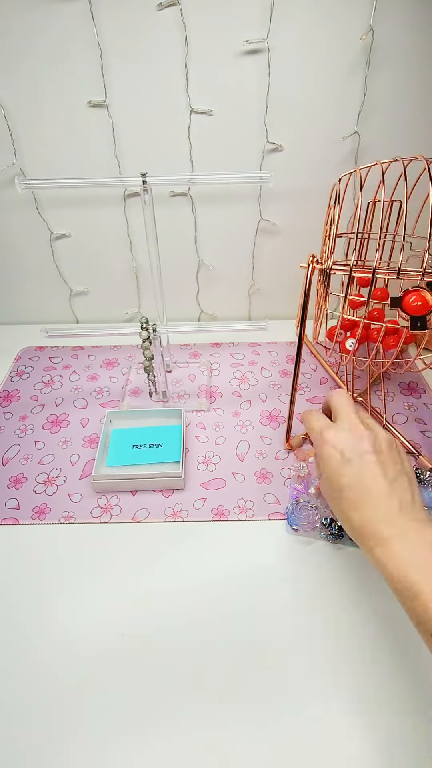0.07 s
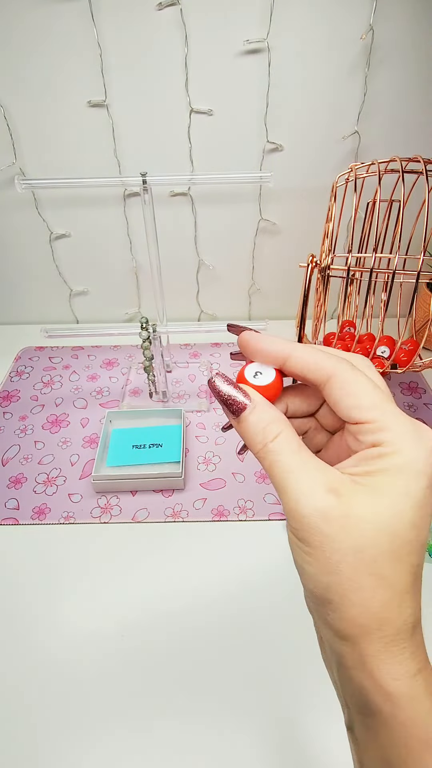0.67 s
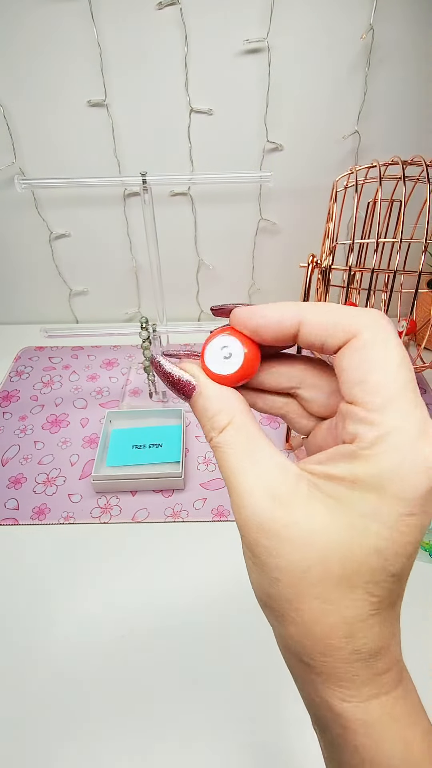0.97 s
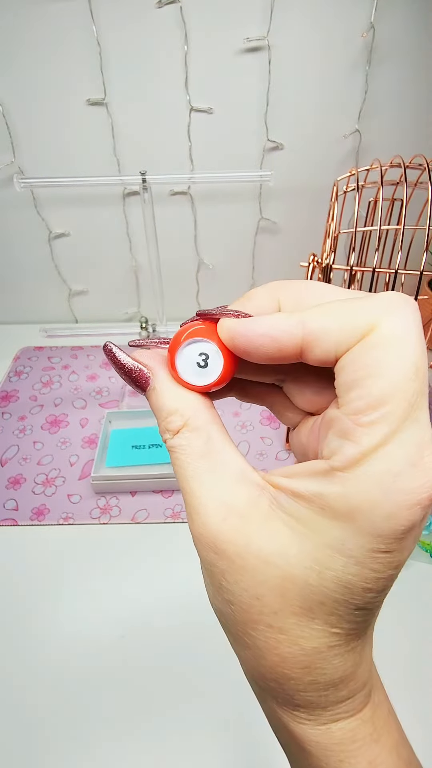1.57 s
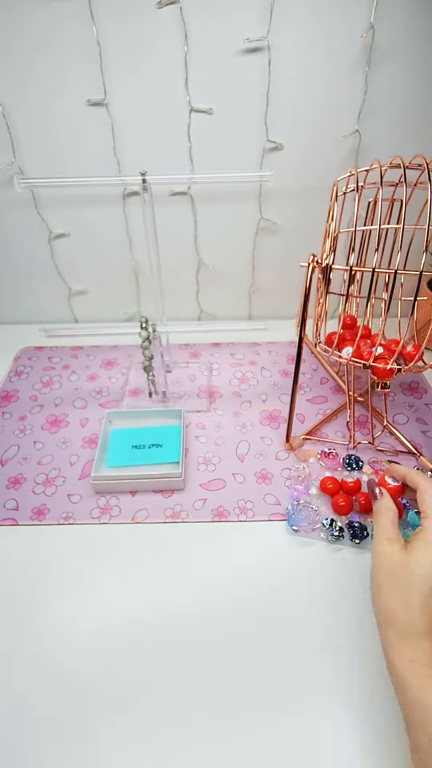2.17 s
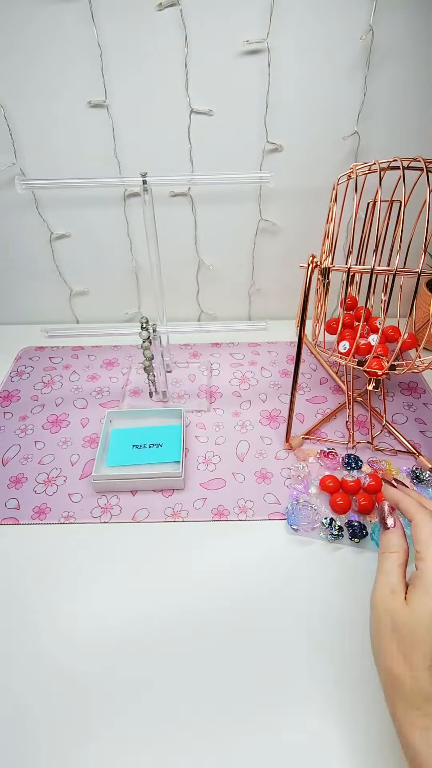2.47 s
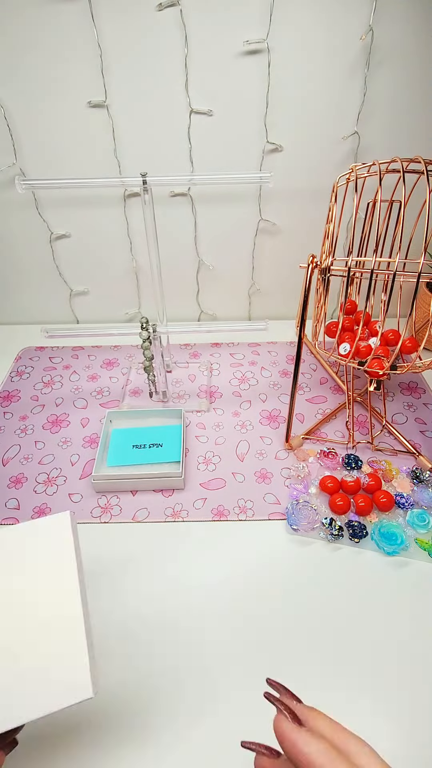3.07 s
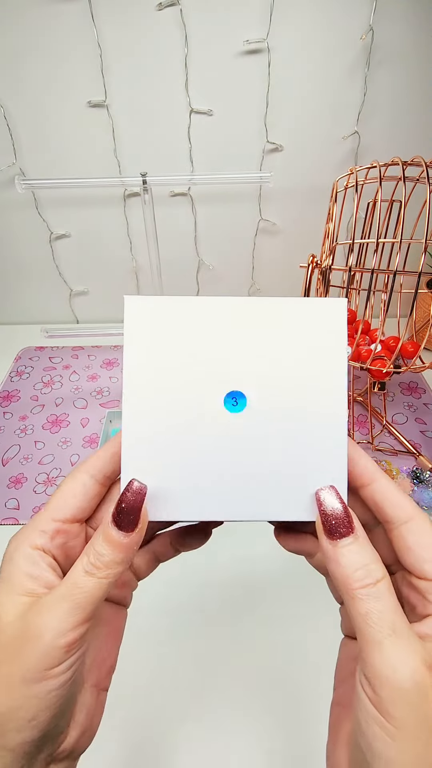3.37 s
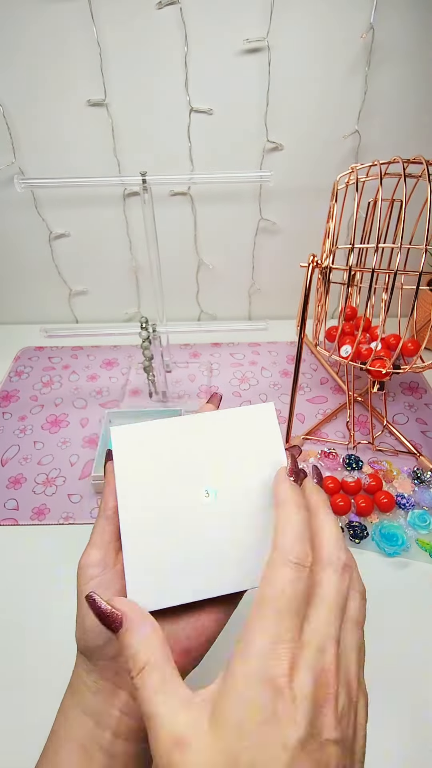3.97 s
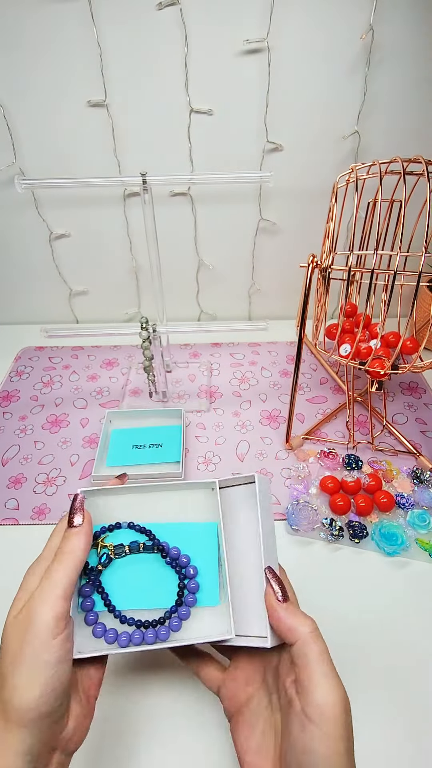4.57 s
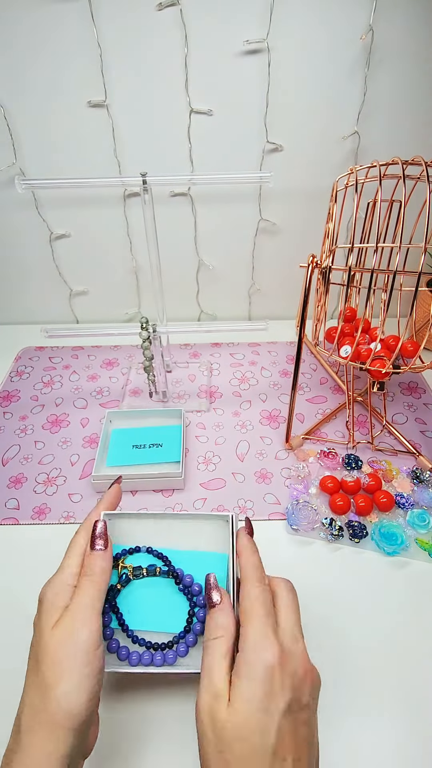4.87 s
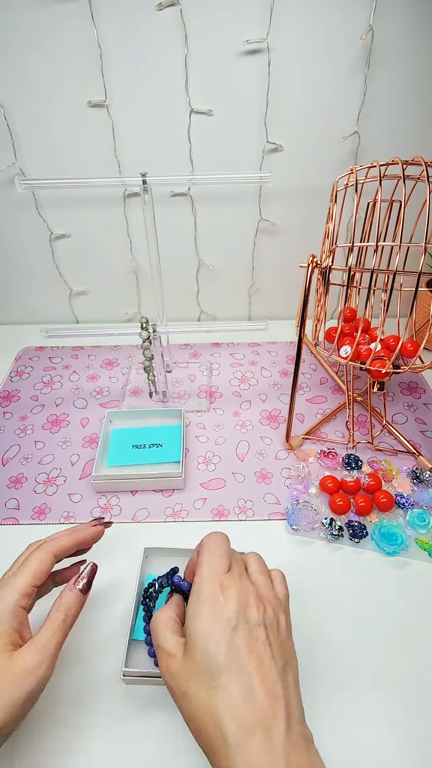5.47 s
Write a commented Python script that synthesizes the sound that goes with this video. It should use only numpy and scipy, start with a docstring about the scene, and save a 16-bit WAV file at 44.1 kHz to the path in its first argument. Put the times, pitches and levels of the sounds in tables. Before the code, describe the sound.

Plastic balls rattle in a ringing wire cage, then a cardboard box is slid open and set down with beads clicking.

```python
"""Plastic balls tumble in a wire lottery cage on a desk, making its wires and stand ring, then shift
in short spills as it rocks to rest. Next, one ball is set down among others with a brief clatter.
A small cardboard box is picked up; its lid rubs and squeaks as it slides off, and the box is put down.
Last, fingernails reach for the bead bracelets inside, which click and rustle.
All of it is heard in a small quiet room, through a close stereo microphone."""
import sys
import numpy as np
from scipy import signal
from scipy.fft import rfft, irfft
from scipy.io import wavfile

SR = 44100
rng = np.random.default_rng(int(sys.argv[2]) if len(sys.argv) > 2 else 0)


def store_wav(level_fs):
    """Save 16-bit WAV to argv[1]."""
    pcm = np.round(np.clip(np.atleast_2d(level_fs), -1, 1) * 32767)
    wavfile.write(sys.argv[1], SR, pcm.T.astype(np.int16))


N = 242991
TIME = np.arange(N) / SR


def from_db(db):
    """Turn decibels into a gain to multiply by."""
    return 10 ** (np.asarray(db) / 20)


def rms_one(x):
    """Scale a sound to an average power of one."""
    return x / np.sqrt(np.mean(x ** 2) + 1e-20)


def add(out, s, sound):
    """Mix a sound in, starting at s seconds."""
    start = int(np.clip(round(s * SR), 0, N))
    out[:, start:start + sound.shape[1]] += sound[:, :N - start]


def pan(x, left_db):
    """Make the left side louder than the right by left_db."""
    return x * from_db([[left_db / 2], [-left_db / 2]])


def noise(size, alike=0):
    """White noise at two microphones that share a part of it."""
    white = rng.standard_normal((3, size))
    return np.sqrt(alike) * white[0] + np.sqrt(1 - alike) * white[1:]


def spaced_noise(size, shared_below_hz=390):
    """Stereo noise: long waves reach both microphones alike, short ones differ."""
    hz = np.arange(size // 2 + 1) * SR / size
    alike = 1 / (1 + (hz / shared_below_hz) ** 4)
    white = rfft(rng.standard_normal((3, size)))
    return irfft(np.sqrt(alike) * white[0] + np.sqrt(1 - alike) * white[1:], size)


def band(x, low_hz, high_hz, order=2):
    """Keep what lies between two frequencies."""
    return signal.sosfilt(signal.butter(order, [low_hz, high_hz], "band", fs=SR, output="sos"), x)


def brighten(x, treble_db, corner_hz=7000):
    """Turn the treble above the corner up or down."""
    treble = signal.sosfiltfilt(signal.butter(2, corner_hz, "high", fs=SR, output="sos"), x)
    return x + (from_db(treble_db) - 1) * treble


def resonate(x, hz, width_hz):
    """Ring at one note; the narrower the width, the longer it rings."""
    r = np.exp(-np.pi * width_hz / SR)
    feedback = [1, -2 * r * np.cos(2 * np.pi * hz / SR), r * r]
    return signal.lfilter(np.array([1, 0, -1]) * (1 - r * r) / 2, feedback, x)


def body(x, spectrum, notes=(), size=8192):
    """Pass a sound through an object, which gives it a tone colour and ringing notes."""
    hz, db = np.transpose(spectrum)
    bins_hz = np.maximum(np.arange(size // 2 + 1) * SR / size, 1)
    gains = from_db(np.interp(np.log(bins_hz), np.log(hz), db))
    cepstrum = irfft(np.log(gains))
    colour = irfft(np.exp(rfft(2 * cepstrum[:size // 2], size)))   # nothing sounds before the hit
    response = colour + sum(from_db(level) * resonate(colour, f, width) for f, width, level in notes)
    return signal.fftconvolve(x, response[None] / np.linalg.norm(response))[:, :x.shape[1]]


def grains(size, per_s, spread_db, fall_s):
    """The flickering loudness of many tiny contacts."""
    hits = rng.random(size) < per_s / SR
    strength = from_db(spread_db * np.minimum(rng.exponential(1, size), 3))
    power = signal.lfilter([1], [1, -np.exp(-2 / (fall_s * SR))], (hits * strength) ** 2 + 1e-12)
    return rms_one(np.sqrt(power))


def swell(fall_s, rise_share=0.92, rounding=0.37, cut_at=3.4):
    """A loudness curve with a round peak and steep ends, and the seconds it takes to peak."""
    rise_s = rise_share * fall_s
    t = np.arange(-7 * rise_s, 7 * fall_s, 1 / SR)
    distance = np.where(t < 0, t / rise_s, t / fall_s)
    fade = np.hypot(distance, rounding) - rounding
    return np.exp(-fade - (fade / cut_at) ** 4), 7 * rise_s


def shaped(x, envelope):
    """Give a noise this loudness curve and the energy that goes with it."""
    return rms_one(x * envelope) * np.sqrt(np.mean(envelope ** 2))


def hiss(size, treble_db):
    """The noise of surfaces touching: a bright band with a treble band above it."""
    bright = rms_one(band(noise(size), 2350, 5600))
    return bright + from_db(treble_db) * rms_one(band(noise(size), 6000, 12500))


# The steady air of the room. Each row: frequency in Hz, relative level in dB.
AIR_COLOUR = [(8, -12), (20, -1.5), (70, -4), (130, -10.5), (250, -19), (500, -20.5), (900, -20.5),
              (1300, -25), (2500, -34.5), (4000, -42), (7000, -46), (10000, -56), (16000, -56.5)]
# A low rumble. Each row: time in seconds, relative level in dB.
RUMBLE_LEVELS = [(0, -74.5), (1.5, -72), (1.7, -60.5), (2.1, -60.5), (2.4, -66.5), (2.85, -62.5),
                 (3.1, -81), (5.5, -78)]

def background(air_db=-65, rumble_trim_db=-1):
    """Steady room air and a low rumble that comes and goes."""
    air = body(spaced_noise(N, shared_below_hz=670) + 0.16 * noise(N), AIR_COLOUR)
    rumble = rms_one(band(noise(N, alike=0.65), 100, 160, order=3))
    rumble_db = np.interp(TIME, *np.transpose(RUMBLE_LEVELS)) + rumble_trim_db
    return from_db(air_db) * air + from_db(rumble_db) * rumble


def room_echo(x, echo_db=-13, die_away_s=0.18, first_echo_s=0.0018, treble_hz=7000, treble_lasts=0.82):
    """A blur of echoes from desk and walls; the treble dies sooner."""
    t = TIME[:SR // 2]
    scatter = spaced_noise(len(t)) * (t > first_echo_s)
    dull = signal.sosfiltfilt(signal.butter(1, treble_hz, fs=SR, output="sos"), scatter)
    fade_db = -60 * t / die_away_s
    tail = dull * from_db(fade_db) + (scatter - dull) * from_db(fade_db / treble_lasts)
    return from_db(echo_db) * signal.fftconvolve(x, tail / np.linalg.norm(tail[0]), axes=1)[:, :N]


# The bracelets slip in the box. Each row: peak time and fade time in seconds, level in dB, treble in dB.
BRACELET_SLIPS = [(4.842, 0.019, -50.5, -14), (5.074, 0.011, -50, -24), (5.151, .024, -46, -12),
                  (5.323, .012, -50, -8), (5.368, .011, -46.5, -13), (5.474, 0.016, -59.5, 6.5)]

def bead_slips():
    """Beads slide over card and each other in a rustle of tiny ticks."""
    out = np.zeros((2, N))
    for s, fall_s, db, treble_db in BRACELET_SLIPS:
        shape, lead_s = swell(fall_s)
        ticks = grains(len(shape), per_s=990, spread_db=0, fall_s=0.0014) * hiss(len(shape), treble_db)
        add(out, s - lead_s, from_db(db) * shaped(ticks, shape))
    return out


# Nails, balls and beads touch. Each row: start in seconds, level in dB, treble boost in dB.
SMALL_CLICKS = [(2.096, -51, -9), (2.512, -49.5, 0), (2.79, -53.5, -16), (2.837, -57, 21),
                (3.198, -45.5, 6), (3.234, -39, -14), (4.687, -38.5, -10), (4.829, -41, -26),
                (4.907, -41, 4), (5.073, -39.5, -27), (5.082, -42, -20), (5.105, -22.5, -5),
                (5.2996, -31.5, -36), (5.309, -40, -22), (5.454, -42.5, 14), (5.507, -51, 9)]
# The notes of a bead. Each row: pitch in Hz, width in Hz, boost in dB.
BEAD_NOTES = [(4700, 380, 6.5), (6460, 200, -20), (8000, 500, -0.5)]

def clicks(fall_s=0.0028):
    """Small hard things touch with a very short, bright snap."""
    force, t = np.zeros((2, N)), TIME[:SR // 25]
    for s, db, treble_db in SMALL_CLICKS:
        snap = rms_one(brighten(noise(len(t)), treble_db))
        add(force, s, from_db(db) * np.exp(-t / fall_s) * snap)
    colour = [(300, -8.5), (1400, 4), (3000, -4), (8000, -3.5), (16000, -0.5)]   # Hz, dB
    return pan(body(force, colour, BEAD_NOTES), left_db=-1.5)


def box_wall(x, hz, relative_width=0.23):
    """A cardboard wall rings briefly at a main note and two weaker ones, above and below it."""
    ring = resonate(x, hz, relative_width * hz)
    for ratio in 1.58, 0.66:
        ring -= from_db(-7) * resonate(x, ratio * hz, relative_width * hz)
    return rms_one(band(ring, 540, 3100))


def blow(fall_s, wall_hz, wall_db, crack_db, treble_db, thump_db, desk_hz=150, desk_fall_s=0.0091):
    """A blow on cardboard: the walls' short rattle, a crack and a low thump."""
    t = TIME[:SR // 8]
    shape = (1 - np.exp(-t / 0.0005)) * np.exp(-t / fall_s)   # cardboard yields before it pushes back
    wall = shaped(box_wall(noise(len(t), alike=0.6), wall_hz, relative_width=0.34), shape)
    crack = shape * hiss(len(t), treble_db)
    thump = np.sin(2 * np.pi * desk_hz * t) * np.exp(-t / desk_fall_s)
    return from_db(wall_db) * wall + from_db(crack_db) * crack + from_db(thump_db) * thump


# The notes of the open box. Each row: pitch in Hz, relative level in dB, seconds to fade by 60 dB.
OPEN_BOX_NOTES = [(572, 0, 0.069), (904, -14.5, 0.074), (1206, -18, .05), (1690, -15, 0.048)]
# The box lands on one edge, then flat. Each row: start in seconds, levels of wall, ring and crack
# in dB, treble compared with the crack in dB.
BOX_LANDINGS = [(5.1089, -25, -33.5, -32.5, -3), (5.1519, -32, -27, -28, -21)]

def box_landings(fall_s=0.0058, wall_hz=1050, thump_db=-44):
    """The open box hits the desk, where it is free to ring."""
    out, t = np.zeros((2, N)), TIME[:SR // 8]
    ring = np.sqrt(2) * sum(from_db(db - 60 * t / ring_s) * np.sin(2 * np.pi * hz * t)
                            for hz, db, ring_s in OPEN_BOX_NOTES)
    for s, wall_db, ring_db, crack_db, treble_db in BOX_LANDINGS:
        hit = blow(fall_s, wall_hz, wall_db, crack_db, treble_db, thump_db)
        add(out, s, pan(from_db(ring_db) * ring, left_db=2.5) + hit)
    return pan(out, left_db=2)


# The hollow note of the box. Each row: time in seconds, pitch in Hz.
HOLLOW_PITCHES = [(3, 635), (3.3, 470), (3.85, 558), (4.1, 364), (4.5, 346), (4.6, 530), (4.9, 442),
                  (5.15, 557)]

def hollow_note(s):
    """Pitch of the air in the box at this moment, lower while the hand clasps it."""
    return np.interp(s, *np.transpose(HOLLOW_PITCHES))


# Knocks on the held box. Each row: start in seconds, level in dB, wall pitch in Hz,
# hollow note compared with the wall in dB, thump level in dB.
BOX_KNOCKS = [(3.234, -28, 1370, -8.5, -56), (3.288, -45.5, 1480, -9, -66), (3.773, -43.5, 1420, -7.5, -60),
              (3.921, -36.5, 1530, -23, -75), (3.996, -47.5, 830, -1, -62), (4.23, -39, 1230, 1.5, -48),
              (4.264, -29.5, 894, -1, -48), (4.675, -33, 1410, -17, -73), (4.688, -25.5, 1460, -15, -70),
              (4.827, -31, 1200, -23, -54), (4.907, -28.5, 1090, -8.5, -51),
              (4.958, -30.5, 1280, -17.5, -45.5), (5.277, -35, 1740, -29, -59)]

def box_knocks(fall_s=0.0045, hollow_fall_s=0.0043):
    """Each knock is a blow plus the hollow note of the box, cut short by the hand."""
    out, t = np.zeros((2, N)), TIME[:SR // 8]
    for s, db, wall_hz, hollow_db, thump_db in BOX_KNOCKS:
        hollow = np.sqrt(2) * np.sin(2 * np.pi * hollow_note(s) * t) * np.exp(-t / hollow_fall_s)
        hit = blow(fall_s, wall_hz, db, crack_db=db - 11.5, treble_db=-19, thump_db=thump_db)
        add(out, s, from_db(db + hollow_db) * hollow + hit)
    return pan(out, left_db=3.5)


def card_hiss(size, db, middling_db=-52, duller_per_db=0.16):
    """Hiss of sliding card: the harder the stroke, the duller."""
    return from_db(db) * hiss(size, treble_db=-10.5 - duller_per_db * (db - middling_db))


# The tight lid squeaks. Each row: peak time and fade time in seconds, level in dB, pitch in Hz.
LID_SQUEAKS = [(4.387, .011, -54.5, 1155), (4.737, 0.016, -46, 1050), (4.807, 0.0082, -43, 1036),
               (4.833, 0.0058, -37.5, 1200), (4.908, .005, -32.5, 1126), (4.959, .008, -38, 1324),
               (4.99, 0.02, -46.5, 1160)]

def lid_squeaks(width_hz=160, wall_db=-5, hiss_db=-8):
    """The lid sticks and slips fast enough to sing one narrow, rough note."""
    out = np.zeros((2, N))
    for s, fall_s, db, hz in LID_SQUEAKS:
        shape, lead_s = swell(fall_s)
        n = len(shape)
        note = resonate(noise(n, alike=0.5), hz, width_hz)
        note = shaped(resonate(note, hz, width_hz), shape)
        wall = from_db(wall_db) * shaped(box_wall(noise(n), hz), shape)
        slips = grains(n, per_s=1200, spread_db=-2.5, fall_s=0.0025)
        contact = shape * slips * card_hiss(n, db + hiss_db)
        add(out, s - lead_s, from_db(db) * (note + wall) + contact)
    return pan(out, left_db=-0.2)


# Fingers and lid slide on the cardboard. Each row: peak time and fade time in seconds, level in dB,
# wall pitch in Hz, then hollow note and hiss, both compared with the wall in dB.
BOX_STROKES = [(3.026, .016, -62, 840, 4, -1), (3.109, 0.067, -75, 1360, -6, 0),
               (3.204, .013, -58, 1300, 1.5, -3), (3.229, 0.0062, -50.5, 1380, -5, -2),
               (3.49, 0.0095, -68, 1130, -4, -18), (3.728, 0.012, -71, 1400, -3, -5),
               (3.847, 0.031, -58.5, 1260, 1, -4.5), (3.932, .009, -33, 1490, -15, -14.5),
               (4.063, .018, -59, 1200, -1, -2.5), (4.107, .013, -42, 1480, -6, -10),
               (4.169, 0.023, -53.5, 1310, 2.5, -11.5), (4.24, .0095, -37, 1310, -2.5, -14.5),
               (4.275, .014, -37, 984, -14.5, -11), (4.442, .017, -44, 1280, -21, -3),
               (4.519, .018, -41.5, 1040, -3, -5.5), (4.585, 0.025, -36, 1490, -9, -6),
               (4.69, .012, -24.5, 1344, -8, -12.5), (5.129, 0.024, -46, 1140, -10, -1.5),
               (5.271, .007, -60, 1600, -8, -8), (5.367, .011, -48.5, 1440, -6, -8),
               (5.423, 0.021, -64, 1310, -1, 0.5)]

def box_rubs(hollow_width_hz=190, trim_db=-0.2):
    """Tiny sticks and slips stir the air in the box and its walls, and hiss where they touch."""
    out = np.zeros((2, N))
    for s, fall_s, db, wall_hz, hollow_db, hiss_db in BOX_STROKES:
        shape, lead_s = swell(fall_s)
        n = len(shape)
        slips = grains(n, per_s=2200, spread_db=1, fall_s=0.0023)
        air = resonate(slips * noise(n, alike=0.32), hollow_note(s), hollow_width_hz)
        hollow = from_db(hollow_db) * shaped(band(air, 150, 800), shape)
        wall = shaped(box_wall(slips * noise(n, alike=0.18), wall_hz), shape)
        contact = shape * slips * card_hiss(n, db + hiss_db)
        add(out, s - lead_s, from_db(db) * (hollow + wall) + contact)
    return pan(from_db(trim_db) * out, left_db=1)


def box_shudder(hz=215, width_hz=90, trim_db=-7.5):
    """The same strokes shake the whole box in the hand, more so when its hollow note is low."""
    out = np.zeros((2, N))
    for s, fall_s, db, _, hollow_db, _ in BOX_STROKES:
        shape, lead_s = swell(fall_s)
        gain = from_db(db + hollow_db + trim_db) * (350 / hollow_note(s)) ** 3
        shudder = resonate(noise(len(shape), alike=0.47), hz, width_hz)
        add(out, s - lead_s, gain * shaped(shudder, shape))
    return out


# The tone of balls bumping on the desk. Each row: frequency in Hz, relative level in dB.
HEAP_COLOUR = [(50, -22), (100, -13.5), (280, -6.5), (400, -9.5), (560, -5.5), (950, -1.5), (1400, -1.5),
               (2200, -3), (3000, -6), (4500, -5.5), (6200, -4), (7500, -10.5), (10000, -14),
               (16000, -21.5)]
# The notes of those balls and their tray. Each row: pitch in Hz, width in Hz, boost in dB.
HEAP_NOTES = [(555, 22, 2), (865, 71, 1.5), (1360, 56, 2), (2200, 65, -0.5), (2420, 45, -5.5),
              (3250, 77, -2), (4530, 56, -2.5), (5800, 75.3, -2), (6260, 280, 0.5)]
# The held ball nudges the heap. Each row: peak time and fade time in seconds, level in dB.
BALL_NUDGES = [(2.303, .011, -51.5), (2.374, 0.009, -24), (2.494, 0.0077, -46), (2.523, .009, -47),
               (2.832, .014, -56.5), (2.888, .01, -59.5)]

def ball_set_down(firm_db=-24, brighter_per_db=0.67):
    """The ball shoves its neighbours: brief clatters that swell and die, duller when gentle."""
    force = np.zeros((2, N))
    for s, fall_s, db in BALL_NUDGES:
        shape, lead_s = swell(fall_s)
        clatter = spaced_noise(len(shape)) * grains(len(shape), per_s=2400, spread_db=1, fall_s=0.0019)
        clatter = brighten(shaped(clatter, shape), brighter_per_db * (db - firm_db), corner_hz=1900)
        add(force, s - lead_s, from_db(db) * clatter)
    return pan(body(force, HEAP_COLOUR, HEAP_NOTES), left_db=1.5)


# Balls spill over each other in the cage. Each row: start in seconds, length in seconds, level in dB.
BALL_SPILLS = [(0, 0.13, -33.5), (0.094, .15, -27.5), (0.257, 0.079, -32.5), (0.327, 0.054, -30.5),
               (0.407, 0.0055, -34.5), (0.502, 0.028, -59), (0.73, 0.044, -39), (0.787, 0.028, -46.5),
               (0.835, 0.083, -38), (1.015, .005, -45.5), (1.114, 0.033, -41.5), (1.183, .034, -46),
               (1.385, 0.013, -55), (2.089, 0.032, -62.5), (2.785, 0.03, -60.5)]

def tumble_db(rise_db_per_s=1500, sag_db_per_s=41, fall_db_per_s=472):
    """How lively the balls are: each spill rises fast, sags while it lasts and dies away."""
    level_db = np.full(N, -140.0)
    for s, length_s, db in BALL_SPILLS:
        before = rise_db_per_s * np.maximum(s - TIME, 0)
        during = sag_db_per_s * np.clip(TIME - s, 0, length_s)
        after = fall_db_per_s * np.maximum(TIME - s - length_s, 0)
        level_db = np.maximum(level_db, db - before - during - after)
    return level_db


# The high notes of the cage wires. Each row: pitch in Hz, width in Hz, relative level in dB.
WIRE_NOTES = [(6180, 22, -6), (7330, 22, -7), (7861, 18, -10), (11971, 14, -12), (12802, 15, -1),
              (14841, 30, -10), (15203, 14, -2.5), (15234, 24, -5)]

def singing_wires(ring_db=-46, full_db=-33, steepness=2.5):
    """The thin wires sing only while the balls tumble hard."""
    drive_db = steepness * np.minimum(tumble_db() - full_db, 6.5)
    drive = from_db(drive_db) * noise(N)
    rings = sum(from_db(db) * resonate(drive, hz, width) * np.sqrt(SR / (np.pi * width))
                for hz, width, db in WIRE_NOTES)
    return pan(from_db(ring_db) * rings, left_db=4)


# The tone of a ball hitting the cage. Each row: frequency in Hz, relative level in dB.
CAGE_COLOUR = [(50, -13), (90, -1.5), (140, 1.5), (230, -6), (500, -2.5), (750, -6), (1050, -3),
               (2000, -1.5), (3200, -2), (7500, -0.5), (10000, -2), (16000, -3)]
# The notes of the stand and wires. Each row: pitch in Hz, width in Hz, boost in dB.
CAGE_NOTES = [(147, 10, 8), (191.5, 12, 15), (261, 18, 8), (344, 14, 10.5), (405.4, 17, 11), (538.6, 33, 7),
              (836, 40, 6.5), (1298, 28, 4), (1370, 35, 8.5), (2020, 24, -1.5), (2220, 990, -9),
              (4640, 50, -5), (7120, 14, -6), (7500, 170, 1.5), (7620, 12, -5), (8160, 57, 0),
              (9900, 9, -9), (15000, 200, 0)]
# Balls drop on the wires or on each other. Each row: start in seconds, level in dB, treble boost in dB.
BALL_DROPS = [(0.0949, -25, 8), (0.0987, -15, 5.5), (.1395, -24, 20), (.278, -21, -0.5), (0.3277, -30, 2),
              (0.339, -28.5, -18), (0.361, -22.5, 5), (.408, -23.5, 11), (0.522, -38, -0.5),
              (0.7282, -35, 1), (0.8329, -32, 9), (.893, -24.5, 0), (1.0212, -36, 2.5), (1.105, -40, 2),
              (1.178, -32, -0.5), (1.2163, -45, -12), (1.392, -51.5, -14)]

def cage(drop_fall_s=0.0023, brighter_per_db=0.1, wires_per_db=0.6, full_db=-35):
    """A dense rattle and single harder drops ring the wires and stand; livelier balls sound brighter."""
    level_db = tumble_db()
    lively_db = level_db - full_db
    rattle = spaced_noise(N) * grains(N, per_s=2400, spread_db=2, fall_s=0.0049) * from_db(level_db)
    force = brighten(rattle, np.clip(brighter_per_db * lively_db, -4.5, 1), corner_hz=4420)
    t = TIME[:SR // 20]
    for s, db, treble_db in BALL_DROPS:
        hit = rms_one(brighten(spaced_noise(len(t)), treble_db))
        add(force, s, from_db(db) * np.exp(-t / drop_fall_s) * hit)
    # gentle contacts barely reach the highest notes of the wires
    force = brighten(force, np.clip(wires_per_db * lively_db, -6, 1), corner_hz=11300)
    return pan(body(force, CAGE_COLOUR, CAGE_NOTES), left_db=2.5)


def hollow_balls(ball_hz=2120, width_hz=380, ring_db=-9, fall_s=0.003):
    """Each ball that drops answers with the short hollow note of its shell."""
    out, t = np.zeros((2, N)), TIME[:SR // 20]
    for s, db, _ in BALL_DROPS:
        shell = resonate(noise(len(t)), ball_hz, width_hz)
        add(out, s, from_db(db + ring_db) * shaped(shell, np.exp(-t / fall_s)))
    return out


def scene():
    """Everything on the desk, in its room."""
    balls = cage() + singing_wires() + hollow_balls() + ball_set_down()
    box = box_rubs() + lid_squeaks() + box_shudder() + box_knocks() + box_landings() + bead_slips()
    desk = balls + box + clicks()
    return desk + room_echo(desk) + background()


def record(dry, cutoff_hz=16050):
    """The very highest treble is cut off steeply."""
    return signal.sosfilt(signal.ellip(12, .2, 80, cutoff_hz, fs=SR, output="sos"), dry)


dry = scene()
out = record(dry)
store_wav(out)
```